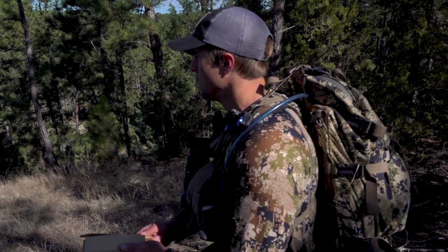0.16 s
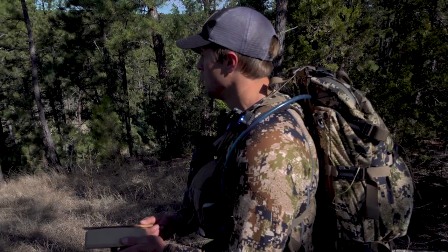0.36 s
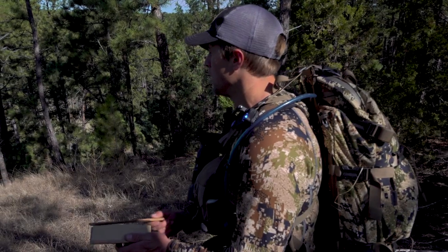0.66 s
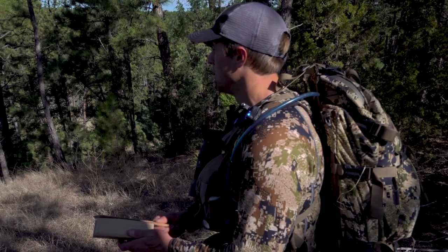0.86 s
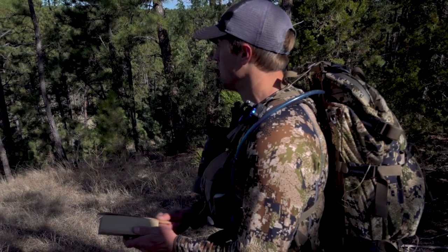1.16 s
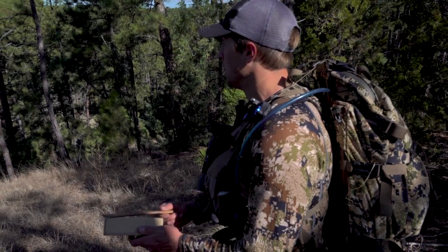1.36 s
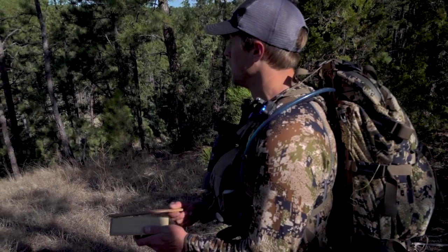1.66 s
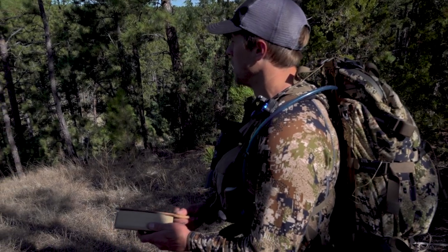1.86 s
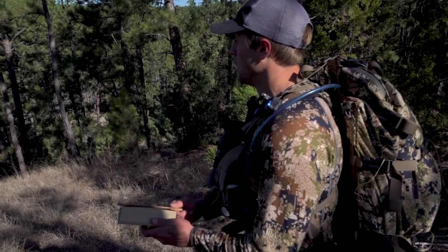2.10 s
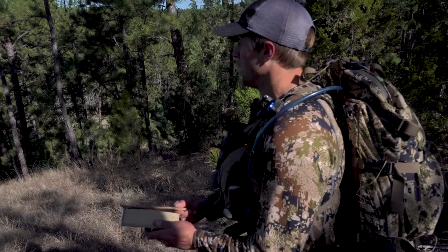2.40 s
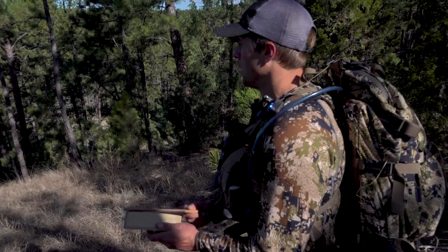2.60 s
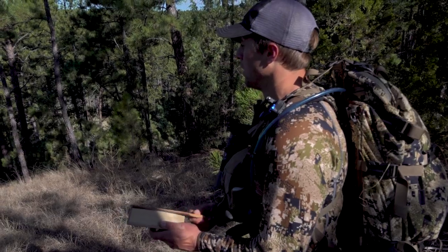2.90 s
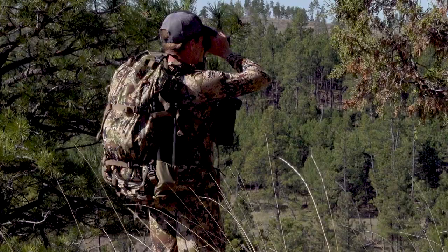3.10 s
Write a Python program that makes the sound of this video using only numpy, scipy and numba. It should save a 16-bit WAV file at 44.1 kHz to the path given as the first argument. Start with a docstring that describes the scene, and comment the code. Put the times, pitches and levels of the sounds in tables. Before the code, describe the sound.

A wooden box turkey call, already under way with earlier echoes lingering, yelps nine times from about 0.2 to 2.95 seconds, roughly every third of a second. Lid taps lead into nasal, scratchy whistles near 1.7 kHz; the first fades, while later ones catch, rasp and drop to a short hollow note. Pines return a blurred tail over faint breeze, with tiny twig ticks near 2.1 and 2.4. Camera gain ducks under each stroke.

```python
"""In a pine wood, a wooden box call is stroked nine times, a couple of metres from a camera.
The lid taps the wall, then sticks and slips along it in a whistle; the first fades, the others catch,
then slide off the edge on a low note. Struck wood is decaying modes, the whistle multiples of a slip rate.
The trees return a long blur of filtered noise, over which a noise breeze stirs and two twigs tick.
The camera's gain control ducks wood and breeze under each stroke."""
import sys
import numpy as np
from scipy import signal
from scipy.fft import rfft, irfft
from scipy.io import wavfile
from scipy.ndimage import uniform_filter1d
from numba import njit

SR = 44100
rng = np.random.default_rng(int(sys.argv[2]) if len(sys.argv) > 2 else 0)


def elevation(decibels):
    """Turn decibel levels (scalar or array-like) into linear amplitude ratios."""
    levels = np.asarray(decibels, float)
    return 10 ** (levels / 20)


def log_audio(samples):
    """Write samples as a 16-bit WAV file to the path given in sys.argv[1]."""
    # one column per channel
    frames = np.atleast_2d(samples).T
    # limit to full scale, then quantise
    limited = np.clip(frames, -1, 1)
    pcm = np.round(limited * 32767).astype(np.int16)
    wavfile.write(sys.argv[1], SR, pcm)


N = 143325

# All source levels are set ahead of the gain control.
# wall swing, one list a stroke, rising, sagging, then, in all but the first, jumping at the catch
# and falling: time_s, swing_hz
STROKE_PITCHES = [
    [(.206,1557),(.222,1667),(.27,1650),(.285,1600),(.318,1550),(.338,1383)],
    [(.531,1530),(.543,1700),(.585,1643),(.618,1574),(.622,1790),(.644,1635)],
    [(.886,1529),(.907,1751),(.922,1700),(.945,1567),(.968,1568),(.974,1713),(.99,1710)],
    [(1.216,1563),(1.235,1704),(1.25,1664),(1.265,1605),(1.281,1562),(1.287,1770),(1.305,1690)],
    [(1.536,1562),(1.551,1748),(1.572,1699),(1.582,1637),(1.606,1601),(1.612,1790),(1.645,1567)],
    [(1.891,1610),(1.905,1700),(1.92,1722),(1.932,1632),(1.953,1580),(1.959,1806),(1.98,1657)],
    [(2.211,1610),(2.228,1700),(2.25,1601),(2.271,1582),(2.277,1743),(2.297,1703)],
    [(2.542,1642),(2.558,1713),(2.57,1671),(2.598,1605),(2.603,1822),(2.638,1612)],
    [(2.878,1660),(2.886,1770),(2.9,1710),(2.912,1610),(2.925,1581),(2.93,1787),(2.964,1635)],
]
# force of each stroke; the first has no real catch, but from its catch_s it falls, rasps and its overtones
# change as in the others: # level_db, sag_db_per_s, firm_grip_s, catch_s, fall_after_catch_db_per_s,
# caught_rasp_db
STROKE_FORCES = [(-20.5,75.5,0.2744,0.3188,1300,-30),(-16,25,0.608,.618,491,-18),(-12.5,84,.93,.971,506,-25),(-13,57,1.258,1.283,491,-20.5),(-13.5,20,1.579,1.608,491,-18.5),(-15.5,37,1.928,1.955,478,-18.5),(-14,91,2.24,2.273,480,-27),(-14,65,2.572,2.599,402,-20.5),(-13.5,90,2.902,2.927,402,-18)]
# lid chattering before it grips: start_s, length_s, swing_hz, level_db
CHATTERS = [(0.87, 0.018, 1553, -32), (2.201, 0.013, 1504, -32), (2.513, 0.011, 1690, -30),
            (2.526, 0.018, 1590, -28.5)]
# lid landing on the wall: start_s, peak_db
TAPS = [(0.18, -35), (0.5106, -32), (0.8721, -18), (1.1938, -26.5), (1.516, -26), (1.8555, -23),
        (2.177, -24), (2.2026, -36), (2.5134, -23.5), (2.5313, -23.5), (2.835, -26)]
# lid knocking the whole box: start_s, peak_db
KNOCKS = [(0.1808, -38), (0.621, -24), (0.6354, -25), (0.9803, -21), (1.2949, -19),  (1.8897, -32.5),
          (1.969, -18.5), (2.2735, -33), (2.286, -26), (2.602, -21), (2.6239, -21)]
# lid sliding off the edge and driving the box note: start_s, length_s, first_hz, level_db
NOTES = [(0.643, 0.01, 1218, -19.5), (0.983, 0.01, 1195, -21), (1.298, .014, 1203, -20),
         (1.631, 0.018, 1251, -24), (1.977, .012, 1240, -22.5), (2.294, 0.0033, 1124, -21),
         (2.636, 0.0052, 1235, -27.5), (2.943, 0.019, 1203, -20.5)]
# small twig ticks: start_s, peak_db
TICKS = [(2.124, -60), (2.445, -56)]
# ringing modes of the wall and of the whole box: pitch_hz, relative_level_db, t60_s
WALL_MODES = [(1286, -13.5, 0.046), (1770, 3, 0.013), (1961, 1, 0.01), (2560, -11.5, 0.014),
              (3140, -11, 0.01), (4130, -40, 0.0075), (6100, -20, 0.0077)]
BOX_MODES = [(357,-21.5,0.023),(1043,1,0.028),(1255,6,0.022),(2306,-19,0.058),(3146,-4,0.041),(4110,-8,0.012)]
# colour of the rasp: frequency_hz, relative_level_db
RASP_COLOUR = [(350, -9.5), (1700, 9.5), (2600, 5.5), (3600, 4), (5300, 0), (7300, -7), (15700, -16)]
# colour of the breeze: frequency_hz, relative_level_db
BREEZE_COLOUR = [(20, -7.5), (45, -4.5), (120, -16), (400, -10.5), (4300, -27.5), (5200, -39.5),
                 (15700, -47.5)]
# decay of the wood's blur: frequency_hz, t60_s
WOOD_T60 = [(500, 0.18), (1700, 1.25), (4000, 0.85), (6000, 0.33), (12000, 0.18)]
# balance of multiples 3 to 12 of the slip rate under each grip: relative_level_db
LOOSE_OVERTONES = [2.5, -14, -13, 4, -7, -18.5, -21, -10.5, -9, -20]
FIRM_OVERTONES = [-0.5, 4, -2.5, 1.5, -1.5, 0.5, -7.5, -11, -11, -14]
CAUGHT_OVERTONES = [4, -3.5, -3.5, -25.5, -9.5, -25.5, -14.5, -15, -11.5, -24.5]

# Whistle; its layer levels in dB are relative to the stroke
WALL_HZ, WALL_WIDTH_HZ = 1700, 990  # the wall radiates best near its resonance
SLIP_DB, EDGE_S = -20, 0.0087  # layer at the slip rate itself; fade at both ends of a stroke
WOBBLE, CATCH_WOBBLE, START_WOBBLE, WOBBLE_HZ = .003, .006, 0.0057, 200  # shares of the pitch; drift rate
LOOSE_JITTER, FIRM_JITTER, CAUGHT_JITTER, JITTER_HZ = .05, .015, .045, 1200  # radians of slip phase; rate
OVER_START_DB, OVER_HOLD_DB, OVER_CATCH_DB = -30.5, -12.5, 6  # overtones; the last is added at catch_s
SLIP_RISE_S = 0.021
BLOOM_SHARE = .4  # part of the loose grip over which the overtones come up
START_TILT_DB = -1.1  # per multiple: the high ones form late
HIGHER_DB = -1.5  # per multiple above the 12th
PATCHY_DB, PATCHY_HZ = 3.5, 40  # drift of each multiple

# Rasp
START_RASP_DB, START_RASP_S, STEADY_RASP_DB, LOOSE_RASP_DB = -23.5, 0.022, -49, -31.5
CATCH_BURST_DB, CATCH_BURST_S = 7.5, .004  # burst over the caught rasp
GRAIN_DB, GRAIN_HZ = 3, 400  # coarse grain

# Struck wood and closing notes
BLOW_SCATTER_DB = 2.5  # spread of mode strengths from blow to blow
NOTE_KNOCK_DB, NOTE_RASP_DB = -3, -15  # relative to the note
NOTE_HZ, NOTE_RISE_S, NOTE_T60_S = 1083.8, 0.00283, 0.033

# Surroundings
BEAT_S = .327  # spacing of the strokes already under way
WOOD_DB, WOOD_RISE_S = -40, 0.0017
NEAR_TRUNKS_DB, NEAR_TRUNKS_S = 10.5, 0.029  # extra early returns and their fade
BREEZE_DB, GUST_DB = -68, 3

# Camera
KNEE_DB, RATIO, ATTACK_S, RELEASE_S, LOOK_AHEAD_S = -34, 3.18, 0.0005, 0.047, .001
TOP_HZ = 15800


def table(points, hz):
    """Read (frequency, value) points on a log-frequency axis."""
    p = np.array(points, float)
    return np.interp(np.log(np.maximum(hz, 1)), np.log(p[:, 0]), p[:, 1])


def coloured(points, size):
    """Noise of rms 1 shaped to a spectrum of (Hz, dB) points."""
    spectrum = rfft(rng.standard_normal(size))
    x = irfft(spectrum * elevation(table(points, np.fft.rfftfreq(size, 1 / SR))), size)
    return x / x.std()


def walk(rate_hz, size):
    """Smooth random drift of spread 1."""
    k = max(int(SR / rate_hz), 2)
    x = uniform_filter1d(uniform_filter1d(rng.standard_normal(size), k), k)
    return x / x.std()


def earlier_strokes(call):
    """Three copies of the first stroke, started on the beat in the second before the scene opens."""
    first = call[:int(.36 * SR)]
    out = np.concatenate([np.zeros(SR), call])
    for k in (1, 2, 3):
        i = SR - int(k * BEAT_S * SR)
        out[i:i + len(first)] += first
    return out


def wood(x):
    """Scatter from the trunks: a noise tail that swells, then dies at its own pace in each band."""
    t, tail = np.arange(2 * SR) / SR, 0
    for hz in 250 * 2 ** np.arange(0, 6, .5):
        edges = [hz / 2 ** .25, hz * 2 ** .25]
        half_octave = signal.butter(2, edges, "band", fs=SR, output="sos")
        band = signal.sosfilt(half_octave, rng.standard_normal(len(t)))
        tail = tail + band * np.exp(-np.log(1000) * t / table(WOOD_T60, hz))
    tail = tail * (1 - np.exp(-t / WOOD_RISE_S)) * elevation(4.0 * walk(25, len(t)))
    tail = tail * (1 + elevation(NEAR_TRUNKS_DB) * np.exp(-t / NEAR_TRUNKS_S))
    return elevation(WOOD_DB) * signal.fftconvolve(x, tail / np.sqrt(SR / 100))[:len(x)]


def breeze():
    """Air stirring: coloured noise whose level drifts in slow gusts."""
    return coloured(BREEZE_COLOUR, N) * elevation(BREEZE_DB + GUST_DB * walk(2.7, N))


def struck(events, modes, push_s, scatter_db):
    """Each blow rings decaying modes, with slightly new strengths and pitches."""
    out, t = np.zeros(N + SR // 10), np.arange(SR // 10) / SR
    hz, db, t60 = np.array(modes, float).T[:, :, None]
    for s, peak_db in events:
        strength, detune = rng.standard_normal((2, len(modes), 1))
        tone = np.sin(2 * np.pi * hz * (1 + .015 * detune) * t)
        ring = elevation(db + scatter_db * strength) * np.exp(-np.log(1000) * t / t60) * tone
        ring = ring.sum(axis=0) * (1 - np.exp(-t / push_s))
        i = int(s * SR)
        out[i:i + len(t)] += ring / np.abs(ring).max() * elevation(peak_db)
    return out[:N]


def taps():
    """The lid lands on the wall: a quick push rings the wall modes."""
    return struck(TAPS, WALL_MODES, 0.00072, BLOW_SCATTER_DB)


def knocks():
    """A softer push rings the whole box, also at the start of each closing note."""
    note_knocks = [(s, db + NOTE_KNOCK_DB) for s, _, _, db in NOTES]
    return struck(list(KNOCKS) + note_knocks, BOX_MODES, 0.0047, BLOW_SCATTER_DB)


def stroke(rows, db, sag_db, firm_s, catch_s, fall_db, rasp_db):
    """Stick-slip whistle: multiples of the slip rate shaped by the grip, plus rasp gated by each slip."""
    rows = np.array(rows, float)
    t = np.arange(int(rows[0, 0] * SR), int(rows[-1, 0] * SR)) / SR
    size = len(t)
    age, late = t - t[0], np.maximum(t - catch_s, 0)

    # Weights of the loose grip, the firm grip and the state from catch_s on
    caught = np.minimum(late / .004, 1)
    loose = np.clip((firm_s - t) / .008, 0, 1)
    firm = np.maximum(1 - loose - caught, 0)
    bloom = 1 - np.exp(-(age / (BLOOM_SHARE * (firm_s - t[0]))) ** 2)

    # The lid slips every second swing of the wall
    wobble = WOBBLE + CATCH_WOBBLE * caught + START_WOBBLE * np.exp(-age / START_RASP_S)
    slip_hz = np.interp(t, *rows.T) / 2 * (1 + wobble * walk(WOBBLE_HZ, size))
    phase = 2 * np.pi * np.cumsum(slip_hz) / SR

    # Overtones keep a steady total while their balance follows the grip
    k = np.arange(3, 20)[:, None]
    # drawn longer than the stroke, so short ones catch only part of a drift
    patchy = np.array([walk(PATCHY_HZ, size + 4000)[:size] for _ in range(len(k) + 1)])
    balance = np.array([LOOSE_OVERTONES, FIRM_OVERTONES, CAUGHT_OVERTONES]).T
    grip_db = (balance @ np.array([loose, firm, caught]))[np.minimum(k[:, 0], 12) - 3]
    tilt_db = HIGHER_DB * np.maximum(k - 12, 0) + k * START_TILT_DB * (1 - bloom)
    gain = elevation(grip_db + tilt_db + PATCHY_DB * patchy[1:])
    jitter = LOOSE_JITTER * loose + FIRM_JITTER * firm + CAUGHT_JITTER * caught
    jitter = jitter * walk(JITTER_HZ, size)
    tones = np.sin(k * (phase + jitter) + rng.uniform(0, 2 * np.pi, k.shape))
    overtones = (gain * tones).sum(axis=0) / np.sqrt((gain ** 2).sum(axis=0))
    over_db = OVER_HOLD_DB + (OVER_START_DB - OVER_HOLD_DB) * (1 - bloom) + OVER_CATCH_DB * caught

    slip = elevation(SLIP_DB + PATCHY_DB * patchy[0]) * (1 - np.exp(-age / SLIP_RISE_S)) * np.sin(phase)
    rasp = elevation(START_RASP_DB) * np.exp(-age / START_RASP_S) + elevation(STEADY_RASP_DB)
    rasp = rasp + elevation(LOOSE_RASP_DB) * loose * bloom
    burst = 1 + elevation(CATCH_BURST_DB) * np.exp(-late / CATCH_BURST_S)
    rasp = rasp + caught * elevation(rasp_db) * burst
    grit = coloured(RASP_COLOUR, size) * elevation(GRAIN_DB * walk(GRAIN_HZ, size)) * (1 + np.sin(phase))

    # From catch_s on the wall tone falls fastest
    resonance = 1 / np.hypot(1, 2 * (2 * slip_hz - WALL_HZ) / WALL_WIDTH_HZ)
    wall = elevation(-fall_db * late) * np.sin(2 * phase) * resonance
    rest = elevation(-.4 * fall_db * late) * (slip + elevation(over_db) * overtones + rasp * grit)
    edge = np.clip(np.minimum(age, t[-1] - t) / EDGE_S, 0, 1)
    return int(t[0] * SR), edge * elevation(db - sag_db * age) * np.sqrt(2) * (wall + rest)


def strokes():
    """The nine whistles, each with its own pitch path and force."""
    out = np.zeros(N)
    for rows, force in zip(STROKE_PITCHES, STROKE_FORCES):
        i, x = stroke(rows, *force)
        out[i:i + len(x)] += x
    return out


def notes():
    """A round note that sinks to the box resonance and rings out; the lid rasps while it slides."""
    out, t = np.zeros(N + SR // 10), np.arange(SR // 10) / SR
    for s, length, hz, db in NOTES:
        pitch_hz = np.interp(t, [length / 2, length], [hz, NOTE_HZ])
        phase = 2 * np.pi * np.cumsum(pitch_hz) / SR
        decay_db = -60 * np.maximum(t - length, 0) / NOTE_T60_S
        ring = elevation(1.5 * walk(WOBBLE_HZ, len(t)) + decay_db) * np.sqrt(2) * np.sin(phase)
        sliding = np.clip((length - t) / NOTE_RISE_S, 0, 1)
        rasp = elevation(NOTE_RASP_DB) * sliding * coloured(RASP_COLOUR, len(t)) * (1 + np.sin(phase))
        i = int(s * SR)
        out[i:i + len(t)] += elevation(db) * np.minimum(t / NOTE_RISE_S, 1) * (ring + rasp)
    return out[:N]


def chatters():
    """Brief stick-slip at one pitch, without a catch."""
    out = np.zeros(N)
    for s, length, hz, db in CHATTERS:
        end = s + length
        i, x = stroke([(s, hz), (end, hz)], db, 0, end, end, 0, -60)
        out[i:i + len(x)] += x
    return out


def ticks():
    """Twigs ticking: two tiny modes under a very quick push."""
    return struck(TICKS, [(3840, -2.0, 0.0071), (7700, 0.92, 0.0013)], 0.000067, 1.6)


def scene():
    """The call, its earlier strokes still ringing in the wood, breeze and ticks."""
    box_call = taps() + knocks() + notes() + strokes() + chatters()
    call = earlier_strokes(box_call)
    air = breeze()
    twigs = ticks()
    return ((call + wood(call))[SR:] + air + twigs)[None]


@njit
def follow(x, up, down):
    """Peak follower: quick up, slow down."""
    e, out = 0., np.empty(len(x))
    for i in range(len(x)):
        a = abs(x[i])
        e += (a - e) * (up if a > e else down)
        out[i] = e
    return out


def gain_control(dry):
    """Lift everything by 13 dB and compress peaks above the knee, looking slightly ahead."""
    envelope = follow(dry[0], 1 / (ATTACK_S * SR), 1 / (RELEASE_S * SR))
    envelope = np.roll(envelope, -int(LOOK_AHEAD_S * SR))
    gain = np.minimum(1, elevation(KNEE_DB) / (envelope + 1e-9)) ** (1 - 1 / RATIO)
    return elevation(13) * gain * dry


def top_cut(x):
    """Nothing passes above the cut-off."""
    return signal.sosfilt(signal.butter(12, 15810, fs=SR, output="sos"), x)


def record(dry):
    """Gain control lifts the quiet and holds down the loud; then a steep low-pass cuts the top."""
    low_pass = signal.ellip(8, .2, 70, TOP_HZ, fs=SR, output="sos")
    mix = signal.sosfilt(low_pass, gain_control(dry))
    return top_cut(mix)


dry = scene()
out = record(dry)
log_audio(out)
```